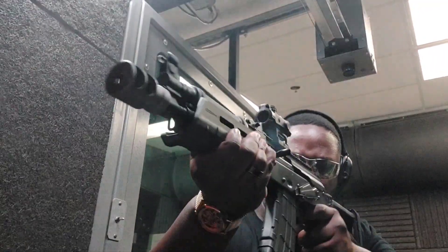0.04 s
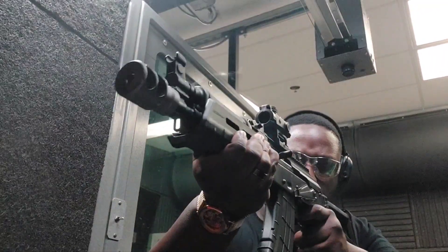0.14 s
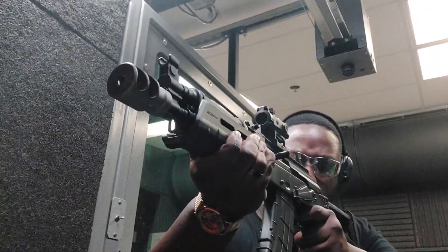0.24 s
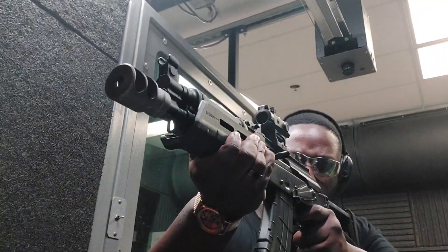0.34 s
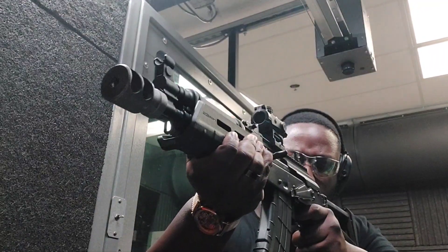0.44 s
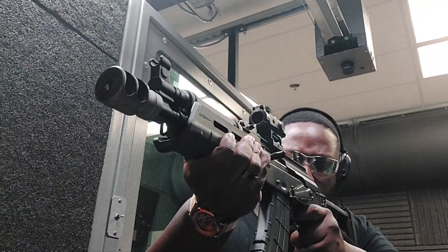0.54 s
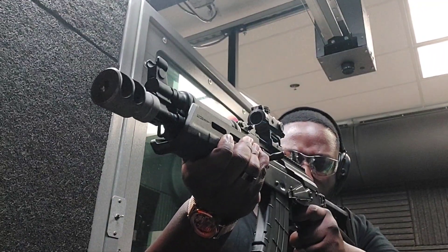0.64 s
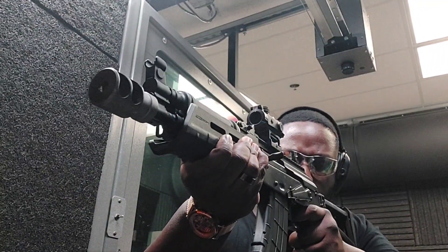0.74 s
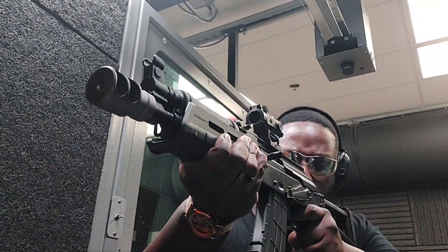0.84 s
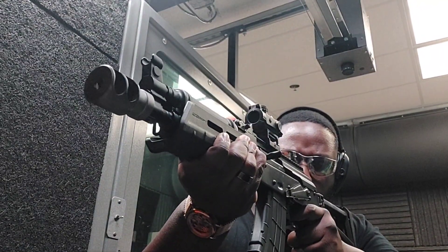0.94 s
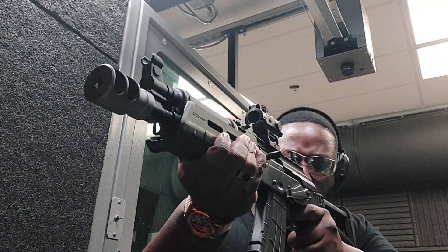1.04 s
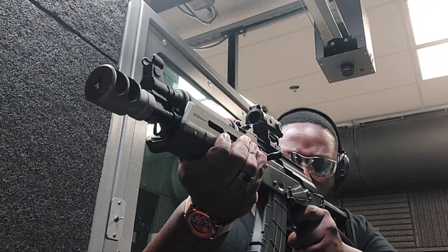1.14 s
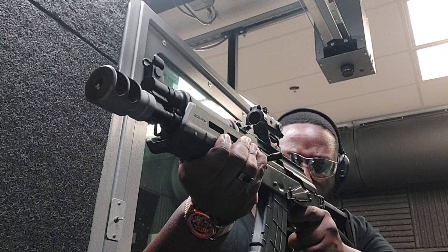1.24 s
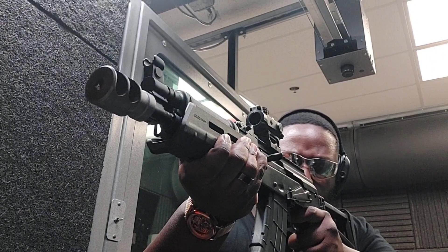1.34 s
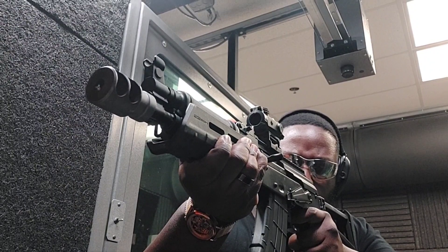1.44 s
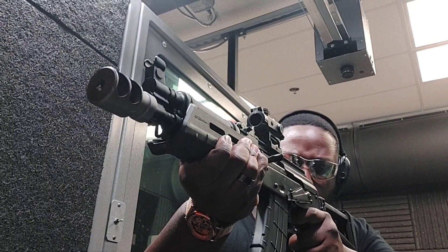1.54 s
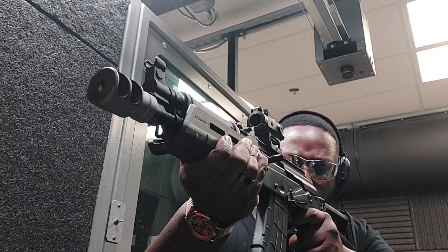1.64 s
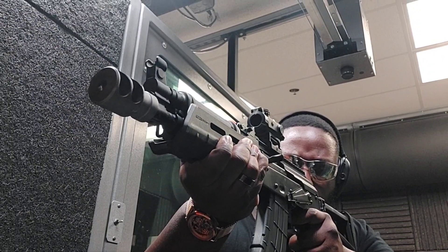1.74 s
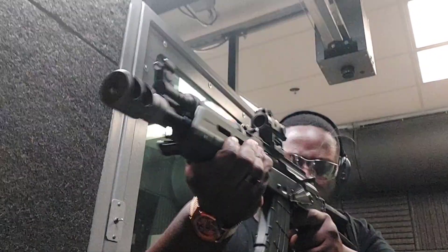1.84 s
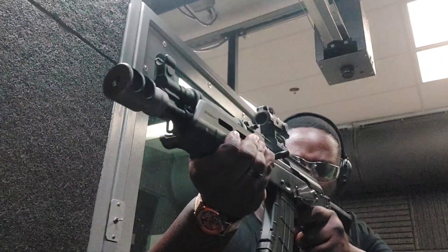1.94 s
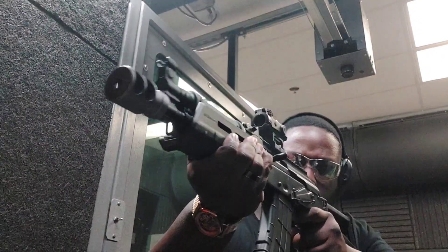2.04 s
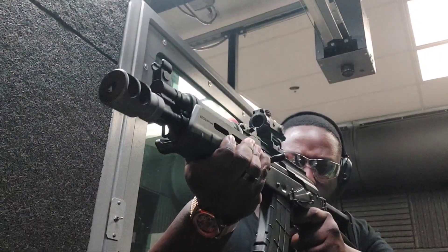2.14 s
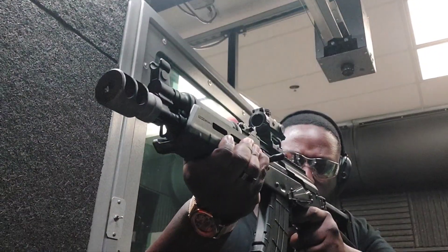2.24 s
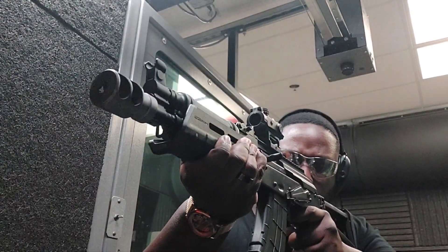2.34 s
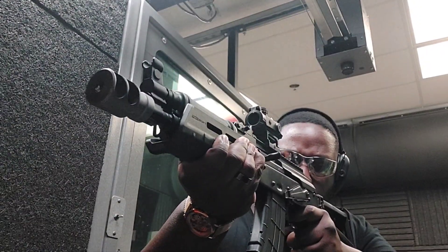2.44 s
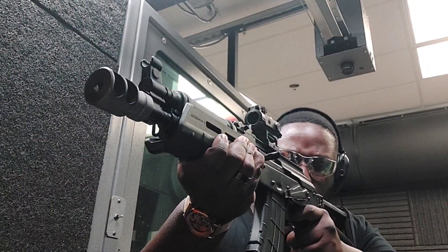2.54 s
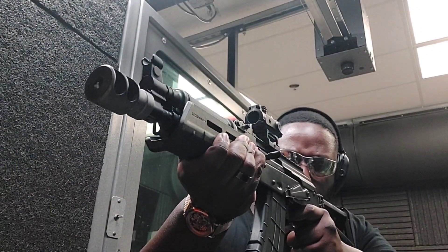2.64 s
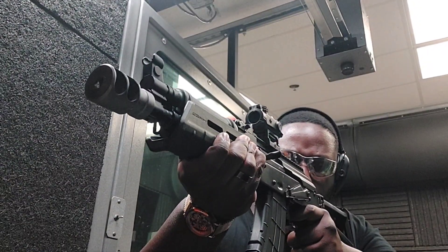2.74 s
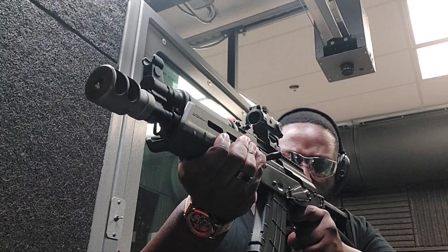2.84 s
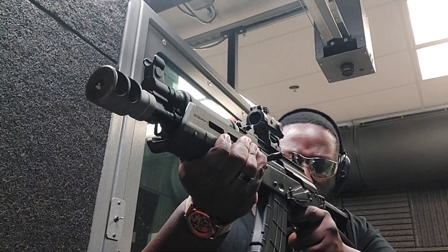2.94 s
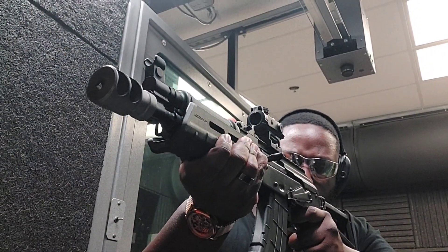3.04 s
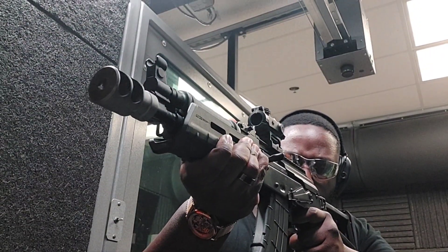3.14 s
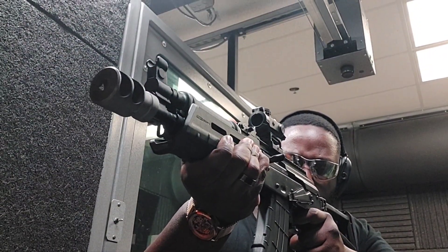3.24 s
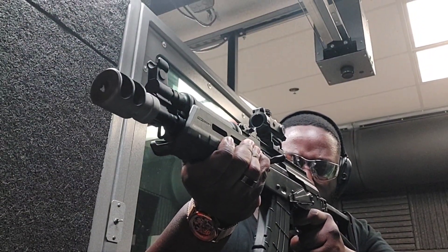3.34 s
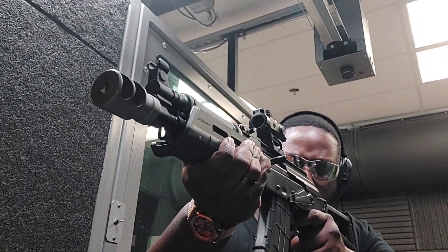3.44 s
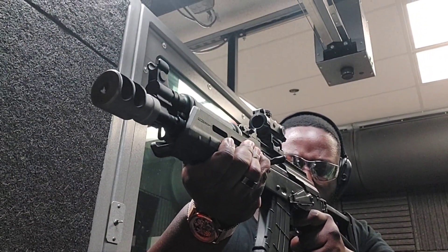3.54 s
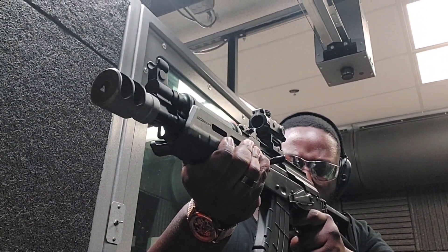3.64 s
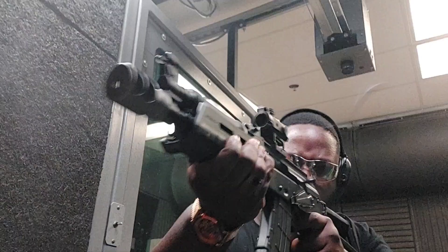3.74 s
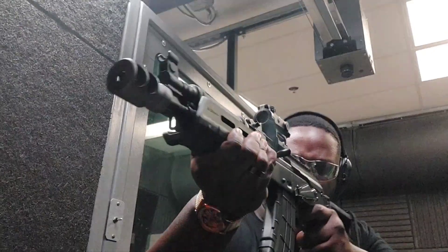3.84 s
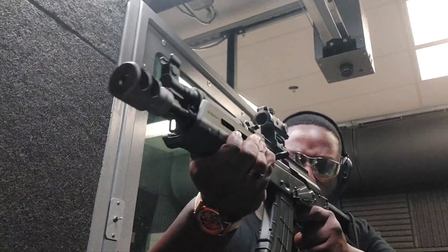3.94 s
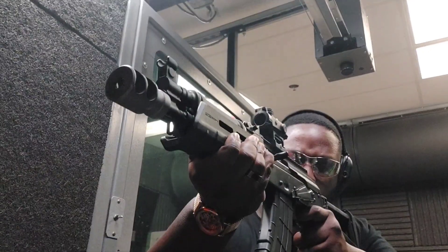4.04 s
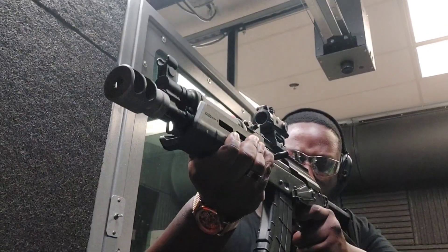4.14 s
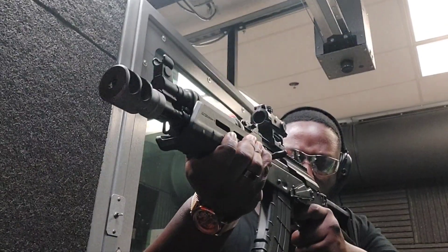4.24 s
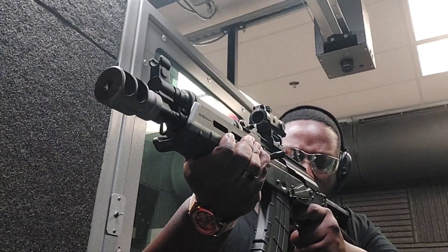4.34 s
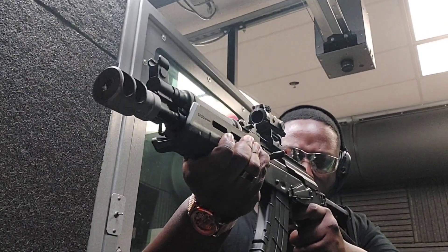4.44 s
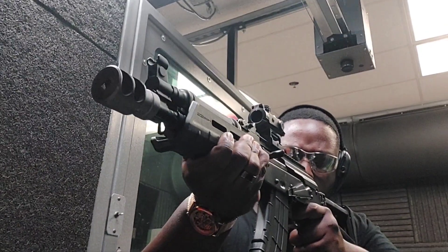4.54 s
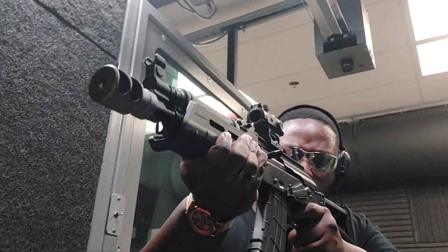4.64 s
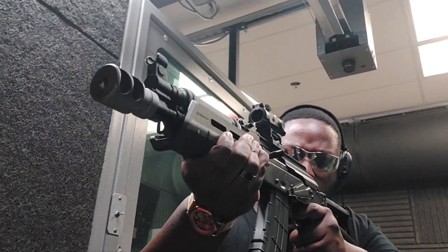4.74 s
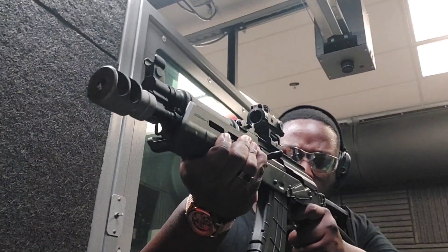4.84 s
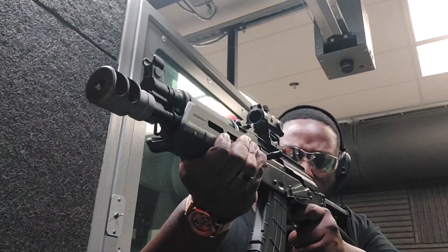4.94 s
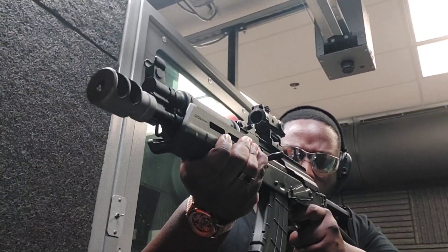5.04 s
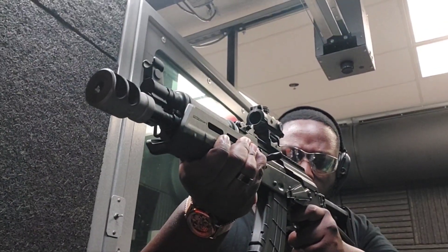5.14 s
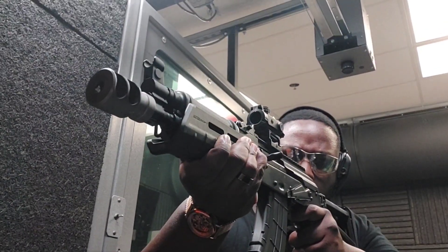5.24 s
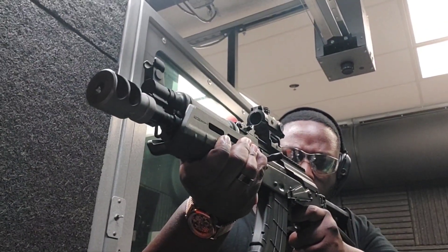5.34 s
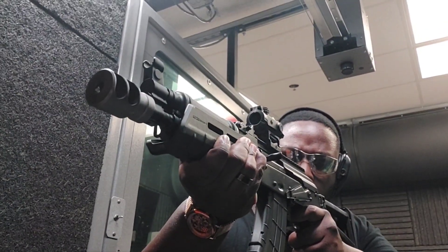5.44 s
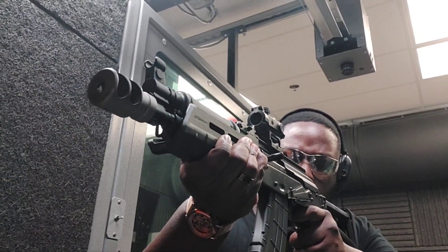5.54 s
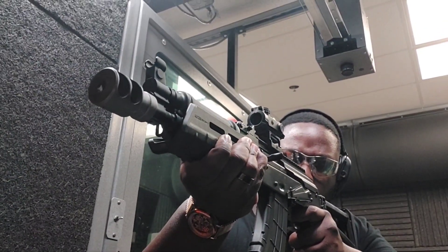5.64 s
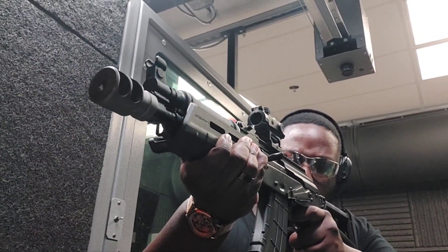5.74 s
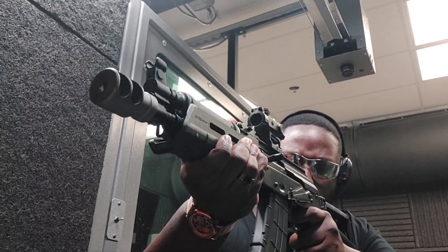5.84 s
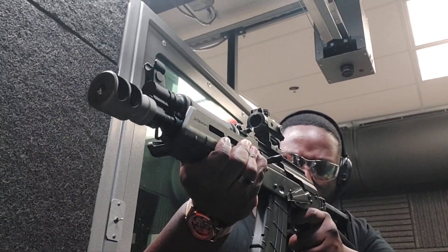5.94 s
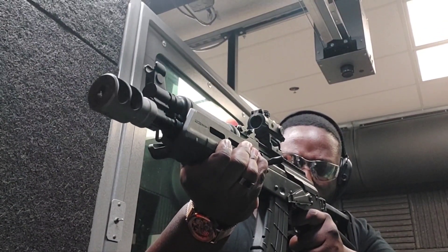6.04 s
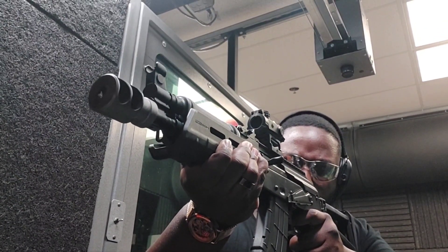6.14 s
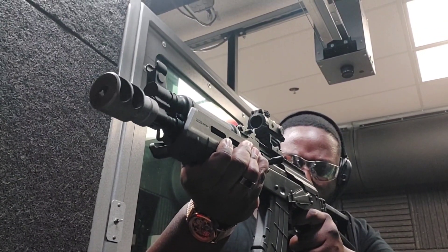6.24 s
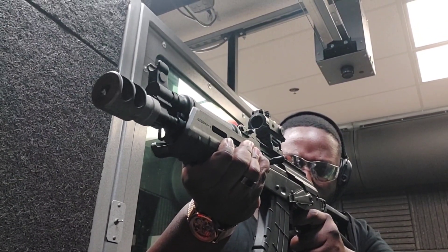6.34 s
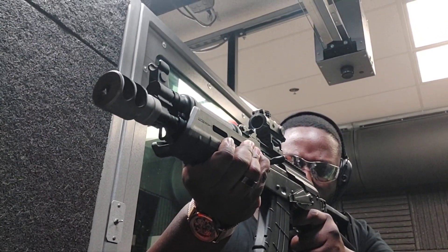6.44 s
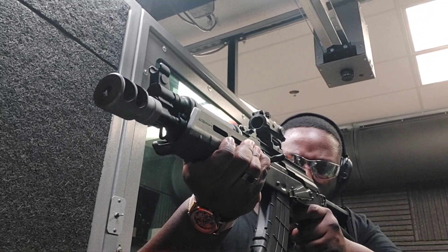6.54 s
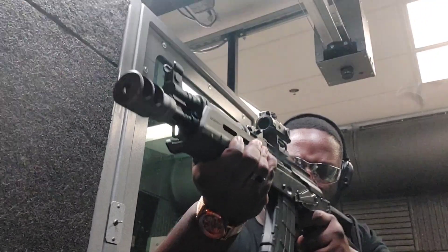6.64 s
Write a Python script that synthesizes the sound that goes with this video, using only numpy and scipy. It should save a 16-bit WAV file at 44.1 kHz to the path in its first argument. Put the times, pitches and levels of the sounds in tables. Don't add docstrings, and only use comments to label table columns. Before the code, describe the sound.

Close, distorted gun blasts spaced about two seconds apart echo off hard walls, with ventilation rising between them and brass casings tinkling, finally landing very near.

```python
import sys
import numpy as np
from scipy import signal
from scipy.fft import rfft, irfft, next_fast_len
from scipy.io import wavfile
from scipy.ndimage import uniform_filter1d

SR = 44100
rng = np.random.default_rng(int(sys.argv[2]) if len(sys.argv) > 2 else 0)


def master(y):
    cut = np.clip(np.atleast_2d(y).T, -1, 1)
    pcm = np.round(cut * 32767)
    wavfile.write(sys.argv[1], SR, pcm.astype(np.int16))


def gain_from_decibels(decibels):
    exponent = np.asarray(decibels, float) / 20
    return 10 ** exponent


N = 295470

# start in seconds, direct blast level in dB, boom level in dB.
BLASTS = [
    (0.0697, -2.5, .3),
    (1.9417, -18, 2.5),
    (3.8325, -4, 1.2),
]
# frequency in Hz, left-right likeness from 0 to 1.
LIKENESS = [(60, 0.99), (290, 0.94), (640, 0.49), (1400, 0.01)]
# frequency in Hz, level in dB per Hz.
DUCT_HISS = [(240, -16.5), (400, -7), (616, -8.5), (1200, -11), (1490, -11.5), (5110, -22), (13900, -49),
             (16000, -72.5)]


def along(points, hz, column=1):
    rows = np.array(points)
    return np.interp(np.log(hz + 1), np.log(rows[:, 0] + 1), rows[:, column])


def noise(seconds, gain, alike):
    hz, t, z = signal.stft(rng.standard_normal((2, int(seconds * SR) + 1024)), SR, nperseg=1024, noverlap=896)
    turn = np.arccos(np.clip(along(alike, hz), -1, 1))[:, None] / 2
    mid, side = z[0] * np.cos(turn), z[1] * np.sin(turn)
    pair = np.array([mid + side, mid - side]) * gain(hz[:, None], t)
    return signal.istft(pair, SR, nperseg=1024, noverlap=896)[1][:, :int(seconds * SR)]


def unit(x):
    return x / np.sqrt(np.mean(x ** 2) + 1e-20)


def resonance(x, hz, width_hz):
    return signal.lfilter(*signal.iirpeak(np.clip(hz, 50, SR / 2.2), hz / width_hz, SR), x)


def add(mix, s, x, pan_db=0):
    part = mix[:, round(s * SR):][:, :x.shape[-1]]
    part += (x * gain_from_decibels([[pan_db / 2], [-pan_db / 2]]))[:, :part.shape[1]]


def walls():
    # frequency in Hz, t60 in seconds.
    wall_decay = [(300, .5), (3000, .5), (8000, .33), (13000, .23)]
    hz, t, z = signal.stft(rng.standard_normal((2, SR // 3)), SR, nperseg=256)
    tail = signal.istft(z * gain_from_decibels(-60 * t / along(wall_decay, hz)[:, None]), SR, nperseg=256)[1]
    return tail / np.linalg.norm(tail[0])


def in_room(x, wet_db):
    wet = gain_from_decibels(wet_db) * signal.fftconvolve(np.atleast_2d(x), walls(), axes=1)
    add(wet, 0, x)
    return wet


def roar(hz, t):
    # frequency in Hz, level in dB per Hz.
    plateau = [(40, -11.5), (165, 0.5), (250, -1.5), (730, -3), (5000, -12), (9900, -22), (12100, -16.5),
               (16000, -18)]
    # frequency in Hz, slope in dB per second.
    swell = [(100, 10.5), (730, 62), (2500, 28.5), (12000, -22)]
    # frequency in Hz, time in seconds.
    release = [(165, 0.23), (430, 0.13), (12000, .11)]
    # frequency in Hz, t60 in seconds.
    near_walls = [(60, .3), (200, .6), (900, 0.3), (2500, 0.45), (10000, 0.24)]
    # frequency in Hz, share of the decay in dB, t60 in seconds.
    far_walls = [(110, -30, .9), (393, -14, 1.1), (900, -9.5, 0.84), (2400, -17.5, 1.534),
                 (8000, -10.5, 0.62), (16000, -9, 0.13)]
    since = t - along(release, hz)
    after = np.maximum(since, 0)
    share = np.clip(gain_from_decibels(along(far_walls, hz)), 0, 1)
    quick = gain_from_decibels(-60 * after / along(near_walls, hz))
    slow = gain_from_decibels(-60 * after / along(far_walls, hz, column=2))
    held = gain_from_decibels(along(plateau, hz) + along(swell, hz) * np.minimum(since, 0))
    return held * ((1 - share) * quick + share * slow)


def shots():
    # frequency in Hz, level in dB, t60 in seconds.
    lane_modes = [(43.1, -28.6, 2.49), (53.4, 3.3, 0.71), (55.3, -16.3, 2.35), (56.0, -3.2, 0.94),
                  (61.1, -7.0, 0.9), (61.9, -28.2, 2.81), (63.6, -10.5, 1.4), (74.5, 0.9, 0.7),
                  (77.2, -6.2, 1.2), (78.9, -18.6, 1.57), (88.7, -32.1, 3.44), (98.8, -11.6, 0.92),
                  (112.7, 4.3, 0.63), (114.1, 4.3, 0.84), (116.1, -5.5, 1.16), (116.9, -2.3, 0.92),
                    (125.8, 4.3, 0.64), (128.3, -3.6, 1.1), (129.5, 4.3, 0.64), (130.3, -30.5, 3.44),
                    (132.2, -2.7, 0.83), (135.8, -2.9, 0.72), (143.5, 4.3, 0.58), (147.6, -15.8, 1.14),
                  (166.7, -27.0, 1.36), (170.5, -41.5, 3.44), (178.9, -37.3, 2.21), (198.7, -15.5, 0.64),
                   (212.6, -7.9, 0.54), (216.2, -33.1, 1.74), (219.3, 4.3, 0.49), (226.4, 4.3, 0.45),
                   (229.1, -11.2, 0.66), (231.9, -3.5, 0.53), (240.4, -5.3, 0.48), (257.3, -2.2, 0.45),
                   (264.5, -21.9, 1.3), (272.3, -16.0, 0.61)]
    # frequency in Hz, width in Hz, level in dB, t60 in seconds.
    baffles = [(270, 35, -36, 1.8), (430, 18, -29, 1.05), (640, 40, -27, .5), (2400, 600, -41, 1.8),
               (2450, 9, -54, 2.3)]
    backstop_m, backstop_db, backstop_hz = 19.9, 29, 670

    mix, t = np.zeros((2, N)), np.arange(int(1.6 * SR)) / SR
    clear = 1 / (1 + np.exp(-(t - .158) / 0.0044))
    swing = sum(gain_from_decibels(db - 60 * t / t60) * np.sin(2 * np.pi * hz * t)
                for hz, db, t60 in lane_modes)
    boom = np.array([np.roll(swing, shift=18), swing])
    boom = boom * (gain_from_decibels(-43.5) * (t > .01) + clear)
    boom = boom * gain_from_decibels(-13 * np.maximum(t - .8, 0))
    swing_rms = np.sqrt(np.abs(uniform_filter1d(swing ** 2, size=1500)) + 1e-9)
    slam = np.abs(swing) / swing_rms

    for s, direct_db, boom_db in BLASTS:
        onset = np.where(t < .0092, gain_from_decibels(direct_db - 400 * t), 1)
        overload = noise(1.6, roar, [(100, .3), (1000, 0.02)])
        tail = noise(1.6, roar, LIKENESS)
        fine = unit(uniform_filter1d(rng.standard_normal(overload.shape), size=60))
        coarse = unit(uniform_filter1d(rng.standard_normal(len(t)), size=350))
        crackle = gain_from_decibels(1.4 * fine + .8 * coarse) * (0.85 + 0.5 * slam)
        steel = sum(gain_from_decibels(db - 60 * (t - .15) / t60) * unit(resonance(rng.standard_normal((2, len(t))), hz, width_hz))
                    for hz, width_hz, db, t60 in baffles)

        u = np.maximum(t - .001, 0) / 0.0015
        pulse = u * (2 - u) * np.exp(-u)
        front = gain_from_decibels(direct_db - 4.5) * pulse + 0.5 * np.roll(pulse, shift=440)
        blast = np.sqrt(1 - clear) * crackle * onset * overload + np.sqrt(clear) * tail
        thrown_back = resonance(u * np.exp(-u * 6), backstop_hz, width_hz=170)

        add(mix, s, gain_from_decibels(0.5) * blast + front)
        add(mix, s, steel * (1 - np.exp(-(t / 0.083) ** 4)))
        add(mix, s - .007, gain_from_decibels(direct_db - 17) * overload[:, 2000:2353])
        add(mix, s, gain_from_decibels(boom_db) * boom)
        add(mix, s + 2 * backstop_m / 343, gain_from_decibels(backstop_db) * thrown_back)
    return mix


def case_rings():
    # (start in seconds, peak level in dB, left-right in dB).
    tumbling = [
        (12800, [(.036, -53, -1), (.5715, -47, 4), (.6689, -62, 2), (.7516, -55, 0), (.8164, -69, 3), (1.1614, -72, 0)]),
        (12350, [(.789, -68, 4), (.8355, -41, 0), (1.3884, -38, 0), (1.7625, -35.5, -7.5), (2.3371, -60, -17), (2.4724, -61, -4.5), (2.535, -68, 7), (2.593, -67, -3.5)]),
        (12950, [(2.942, -37, -3.5), (3.3976, -47.5, -6), (4.2096, -42, 5), (4.304, -50, -4), (4.4554, -53.5, -5.5), (4.519, -59.5, -4), (4.7154, -56.5, 15.5), (5.0844, -42, -5), (5.879, -26.5, -8), (5.9832, -38, -4), (6.3987, -21, -16), (6.4174, -45, 6), (6.652, -27, 8.5), (6.6694, -19, -2)]),
    ]
    free_t60_s, damped_t60_s, light_db, hard_db = .28, 0.22, -56, -42.5
    mix, t = np.zeros((2, N)), np.arange(SR // 3) / SR
    for hz, contacts in tumbling:
        for s, db, pan_db in contacts:
            t60 = np.interp(db, [light_db, hard_db], [free_t60_s, damped_t60_s])
            flutter = unit(resonance(rng.standard_normal((2, len(t))), hz, width_hz=60))
            ring = flutter + .8 * np.sin(2 * np.pi * hz * t)
            add(mix, s, gain_from_decibels(db - 7.5 - 60 * t / t60) * (1 - np.exp(-t / 0.0033)) * ring, pan_db)
    return mix


def case_ticks():
    # start in seconds, peak level in dB, body level in dB, reverberation in dB, body frequency in Hz.
    strikes = [(.0373, -48.5, -3, 7, 5000), (0.5714, -70, 3, 4, 5000), (0.8363, -44.5, 0.5, 2.5, 7500),
               (1.3866, -54.5, 12.5, 4.5, 2150), (1.3895, -60.5, 5, 8, 6860), (1.7648, -36, -11.5, 2, 8000),
               (2.1563, -27, -8, -7, 3000), (2.9395, -33.5, -13.5, -2, 8000),
               (3.3943, -40.5, -17, 3.5, 5530), (4.2123, -51, -10, 3, 3000), (4.8185, -66, -2.5, -1, 1510),
               (5.0773, -35, -5, -38, 5270), (5.078, -40.5, -5, -28.5, 3180),
               (5.877, -26.5, -19, 1.5, 5130), (6.402, -23.5, -8, 1, 5500), (6.6497, -46.5, 9, 10, 2150)]
    floor_pan_db, dry_leans = -2.5, 0.13
    echo_s, echo_db = .0071, 0
    body_boost_db, body_width = 29, .15
    mix, t = np.zeros((2, N)), np.arange(2000) / SR
    for s, db, body_db, wet_db, hz in strikes:
        far = gain_from_decibels(np.clip(wet_db + 4, 0, 9))
        chatter = .08 * rng.standard_normal((2, 2000)) * gain_from_decibels(-60 * t / (.012 * far))
        grit = (t == 0) / far + chatter
        tick = resonance(grit[0], 12000, width_hz=7000)
        tick = tick + gain_from_decibels(body_db + 4) * resonance(grit[1], 4000, width_hz=6000)
        tick = tick + gain_from_decibels(echo_db + min(wet_db, 0)) * np.roll(tick, shift=round(echo_s * SR))
        body = resonance(grit[1], hz, body_width * hz)
        pan_db = floor_pan_db + dry_leans * min(wet_db, 0)
        add(mix, s, gain_from_decibels(db + body_db + body_boost_db) * body, pan_db)
        add(mix, s, gain_from_decibels(db + 15.5) * in_room(tick, wet_db), pan_db)
    return mix


def near_contacts():
    # start in seconds, peak level in dB, thud level in dB, left-right in dB, clack frequency in Hz.
    blows = [
        (3.8125, -38.5, -15.5, 5, 8000),
        (3.8162, -34, -20, 2, 5500),
        (4.6686, -16.5, -6, -13, 3700),
        (4.683, -14.5, -13, -14, 1850),
        (4.6879, -19.5, -1, -14, 5770),
        (6.6846, -7, -16, -9, 5250),
        (6.6906, -10.5, -13, 1.5, 1650),
        (6.6976, -8.5, -9, -2.5, 3394),
    ]
    # start in seconds, level in dB, left-right in dB.
    bench_ring = (4.6879, -22.5, -34)
    mix, t = np.zeros((2, N)), np.arange(SR // 3) / SR
    for s, db, thud_db, pan_db, hz in blows:
        crack = gain_from_decibels(-2.5 - 60 * t / 0.012) * (1 - np.exp(-t / 0.00055)) * rng.standard_normal(len(t))
        impulse = 15 * (np.arange(len(t)) == 20)
        crack = crack + resonance(.6 * crack + impulse, hz, width_hz=700)
        thud = np.sin(2 * np.pi * 190 * t) + .9 * np.sin(2 * np.pi * 450 * t)
        thud = gain_from_decibels(thud_db + 3 - 60 * t / .013) * thud
        add(mix, s, gain_from_decibels(db) * in_room(crack + thud, wet_db=-31.5), pan_db)
    s, db, pan_db = bench_ring
    ring = gain_from_decibels(db - 60 * (t / .034) ** 2.5) * np.sin(2 * np.pi * 12950 * t) * (1 - np.exp(-(t / .002) ** 2))
    add(mix, s, in_room(ring, wet_db=-32.0), pan_db)
    return mix


def bench_knock():
    # frequency in Hz, level in dB, t60 in seconds.
    knock_modes = [(253, -6.5, 0.064), (463, -0.5, 0.043), (780, 2, 0.01)]
    mix, t = np.zeros((2, N)), np.arange(SR // 4) / SR
    knock = sum(gain_from_decibels(db - 60 * t / t60) * -np.sin(2 * np.pi * hz * t) for hz, db, t60 in knock_modes)
    knock = knock * (1 - np.exp(-t / 0.0012))
    add(mix, 5.219, gain_from_decibels(-23.0) * in_room(knock, wet_db=-17))
    return mix


def distant_shot():
    # frequency in Hz, level in dB per Hz.
    far_shot_colour = [(530, -44), (900, -24), (1620, -8.5), (2100, -0.5), (3510, -15.5), (5200, -14.5),
                       (13200, -27), (16000, -20.5)]
    mix, t = np.zeros((2, N)), np.arange(SR // 4) / SR
    far_burst = unit(noise(.25, lambda hz, _: gain_from_decibels(along(far_shot_colour, hz)), [(1000, 0.09)]))
    add(mix, 5.975, gain_from_decibels(-32.5 - 60 * (t / 0.26) ** 2) * (1 - np.exp(-(t / 0.0091) ** 2)) * far_burst)

    def wash_level(hz, after):
        return gain_from_decibels(along(DUCT_HISS, hz) - 60 * after / 1.6) * (1 - np.exp(-after / 0.068))

    wash = unit(noise(.5, wash_level, LIKENESS))
    add(mix, 5.975, gain_from_decibels(-47.5) * wash * np.hanning(SR)[SR // 2:])
    return mix


def sleeve():
    # frequency in Hz, level in dB per Hz.
    cloth_colour = [(2000, -30), (5000, 7), (7500, 2), (11000, -15), (16000, -28)]
    mix, t = np.zeros((2, N)), np.arange(SR // 4) / SR
    rustle = unit(noise(.25, lambda hz, _: gain_from_decibels(along(cloth_colour, hz)), [(1000, .1)]))
    add(mix, 4.32, gain_from_decibels(-58.5) * np.sin(4 * np.pi * t) ** 2 * rustle)
    return mix


def ventilation():
    # frequency in Hz, level in dB per Hz.
    rumble_colour = [(25, -10), (59, 2), (90, -8), (129, 5), (158, -24), (230, -1.5), (425, -17),
                     (650, -58.5)]
    earlier_shot_s, hold_s, climb_db_per_s = -1.6, 1.49, 17
    linger_db, linger_s = 16.5, 0.26
    t = np.arange(N) / SR
    starts = np.array([earlier_shot_s] + [s for s, *_ in BLASTS])
    since = t - starts[np.searchsorted(starts, t) - 1]
    gain_db = climb_db_per_s * np.maximum(since - hold_s, 0) + linger_db * np.exp(-since / linger_s)

    def steady(colour):
        return unit(noise(N / SR + 0.012, lambda hz, _: gain_from_decibels(along(colour, hz)), LIKENESS))[:, :N]

    return gain_from_decibels(gain_db) * (gain_from_decibels(-50) * steady(rumble_colour) + gain_from_decibels(-58.5) * steady(DUCT_HISS))


def scene():
    brass = case_rings() + case_ticks() + near_contacts()
    return shots() + brass + bench_knock() + distant_shot() + sleeve() + ventilation()


def low_pass(x):
    return signal.sosfilt(signal.butter(12, 16830, fs=SR, output="sos"), x)


def record(dry):
    # frequency in Hz, gain in dB.
    pass_band = [(20, -24), (30, -9), (40, -1), (50, 0), (15850, 0), (16050, -36)]
    size = next_fast_len(N + SR // 4)
    clipped = dry / (1 + np.abs(dry / .95) ** 4) ** (1 / 4)
    response = gain_from_decibels(along(pass_band, np.fft.rfftfreq(size, 1 / SR)))
    heard = irfft(rfft(clipped, size) * response, size)[:, :N]
    return low_pass(heard)


dry = scene()
out = record(dry)
master(out)
```